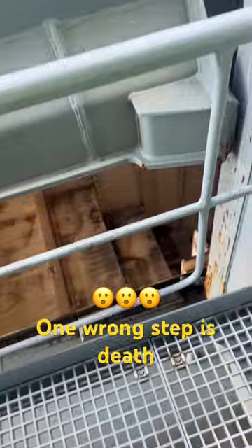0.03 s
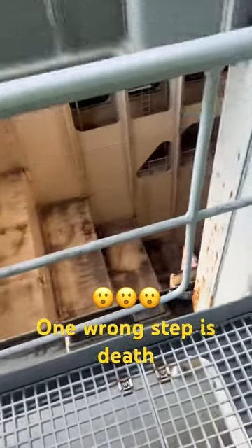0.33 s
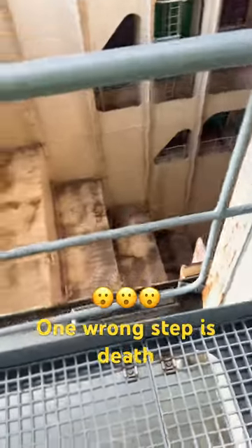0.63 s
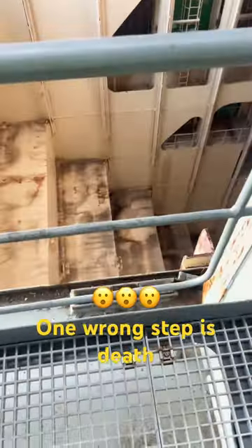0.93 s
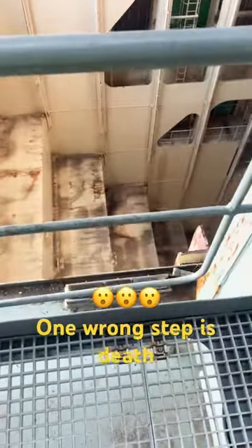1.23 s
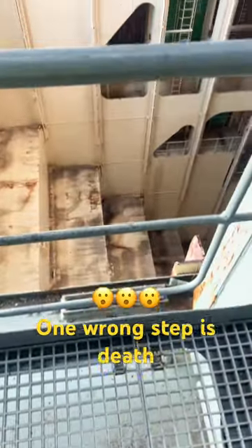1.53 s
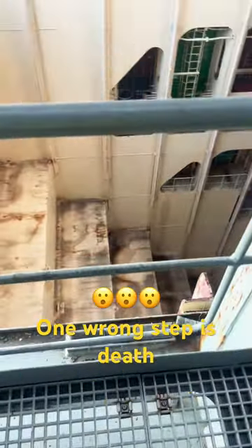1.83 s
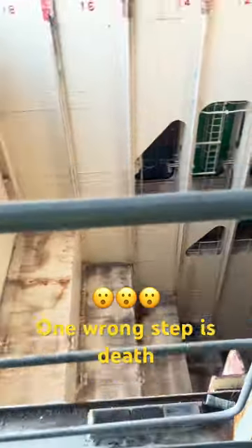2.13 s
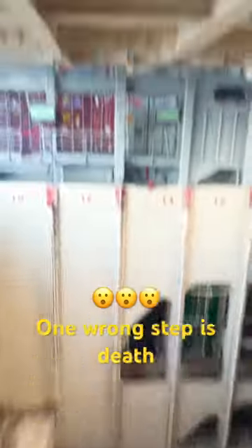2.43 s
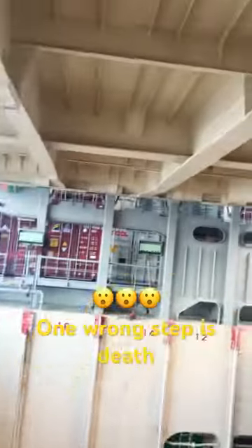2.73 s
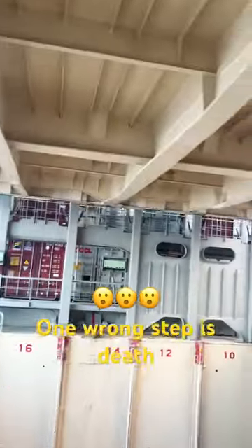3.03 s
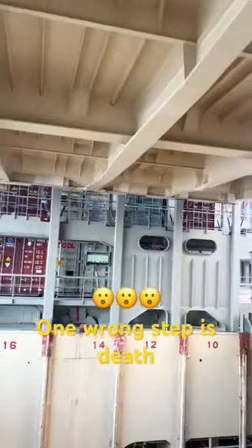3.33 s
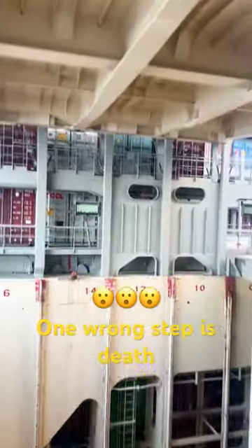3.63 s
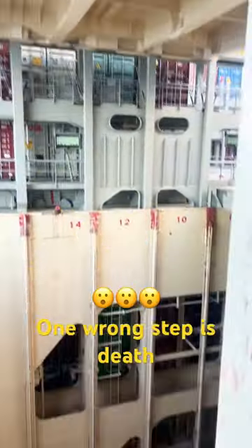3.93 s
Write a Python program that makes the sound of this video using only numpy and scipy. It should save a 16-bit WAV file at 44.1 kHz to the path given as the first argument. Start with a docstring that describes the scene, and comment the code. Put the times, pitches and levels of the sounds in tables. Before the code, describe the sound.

Steel gear crashes at about 0.4 seconds and again, louder, at 1 second, ringing and echoing through a ship's cargo hold. Between the crashes, sliding steel squeals. A brief, faint hiss comes near 1.9 seconds, then small distant clatters from about 2.5 seconds to the end at 4. Machinery rumbles with a high whine throughout, while gusts buffet the microphone, easing between 1.5 and 2 seconds.

```python
"""Machinery rumbles and whines while gusts buffet a phone's two microphone ports, on a walkway above
a ship's cargo hold. Both go on throughout. Steel gear crashes twice, each crash a rush of tiny hits
that makes the metal ring and the hold echo. In between, it squeals as steel slides on steel.
Later come one brief, thin hiss and smaller clatters far off."""
import sys
import numpy as np
from scipy import signal
from scipy.fft import rfft, irfft
from scipy.io import wavfile

SR = 44100
rng = np.random.default_rng(int(sys.argv[2]) if len(sys.argv) > 2 else 0)


def dump_mix(stems):
    """Bounce the given channels to the path in sys.argv[1] as a 16-bit WAV at rate SR."""
    frames = np.atleast_2d(stems).T  # one column per channel
    limited = np.clip(frames, -1, 1)  # hard clip at full scale
    pcm = np.round(limited * 32767).astype(np.int16)
    wavfile.write(sys.argv[1], SR, pcm)


N = 176400  # 4 seconds

# Tone colours of the noises. Each row: frequency in Hz, relative level in dB.
RUMBLE_COLOUR = [(25, -4), (65, 3), (130, -3.5), (300, -10), (600, -16.5), (1100, -18.5), (1800, -25),
                 (2800, -29.5), (4200, -41), (6500, -43.5), (10000, -55), (12500, -73.5)]
FAN_HISS_COLOUR = [(1000, 21), (2000, 5.5), (3000, 12.5), (4300, 14.5), (5200, 1.5), (7000, -21),
                   (9000, -11), (12000, -73.5)]
BUFFET_COLOUR = [(20, -42), (30, -18), (42, -4), (65, 4), (110, -1), (200, -8), (400, -16), (900, -25),
                 (1600, -37), (3000, -77)]
WIDE_FLUTTER_COLOUR = [(30, -21), (90, 3), (180, 5), (350, 1), (700, -1.5), (1100, -10.5), (1800, -27),
                       (3000, -58)]
GEAR_COLOUR = [(100, -21), (400, -3.5), (900, -8), (1400, -7), (2300, -0.5), (3200, 2), (4200, 2),
               (5200, -1), (6300, 4.5), (7300, -0.5), (8500, -1), (11500, -8.5), (13000, -20)]
SCRAPING_COLOUR = [(300, -45), (700, 17), (1400, 7), (2300, 7.5), (3500, -6), (6000, -9), (9000, -12),
                   (12000, -26)]
THIN_HISS_COLOUR = [(1000, -23), (2200, 14.5), (4000, -3), (7000, -9), (9200, 6), (11000, -29)]
# How the lasting sounds swell and fade. Each row: time in seconds, level in dB.
RUMBLE_LEVEL = [(0, -36.5), (.35, -37), (1.2, -32.5), (2, -36.5), (2.5, -32.5), (3, -32), (3.2, -30),
                (4, -32)]  # changes as the phone turns
FAN_LEVEL = [(0, -51), (.38, -63), (1.5, -47), (2.3, -50), (3, -49.5), (3.2, -45.5), (4, -49.5)]
WHINE_LEVEL = [(0, -68), (.07, -50.5), (.11, -59), (.16, -52.5), (.3, -45.5), (.4, -54.5), (.67, -49),
               (.73, -75), (.82, -53.5), (1.5, -52), (1.7, -48.5), (2.05, -44.5), (2.13, -48.5),
               (2.3, -49.5), (2.35, -59), (2.47, -48.5), (2.52, -44), (2.6, -46), (2.68, -54), (2.76, -55),
               (2.81, -40), (2.89, -51), (2.95, -43), (3, -62), (3.1, -42.5), (3.19, -53.5), (3.29, -53.5),
               (3.36, -40.5), (3.5, -40.5), (3.62, -43), (3.77, -45.5), (3.88, -48), (4, -34.5)]  # changes as the phone moves
WHINE_SIDE_LEVEL = [(0, -43), (.2, -45), (.42, -36), (.7, -43), (1.05, -38), (1.25, -46), (1.42, -40),
                    (1.57, -47), (1.7, -45), (2.15, -41), (2.33, -53), (2.55, -42), (2.68, -48),
                    (2.77, -41.5), (3.3, -43), (3.5, -38), (3.65, -46), (3.85, -35.5), (4, -51)]  # the part that is opposite in the two ears
GUST_LEVEL = [(0, -22), (.06, -16.5), (.11, -26.5), (.17, -20), (.21, -36.5), (.26, -16), (.31, -29.5),
              (.34, -19), (.39, -24.5), (.425, -14.5), (.5, -22), (.54, -26), (.57, -22), (.61, -32.5),
              (.66, -28), (.74, -38), (.775, -16.5), (.82, -24), (.86, -24.5), (.93, -48), (.98, -50),
              (1.04, -32), (1.21, -21.5), (1.29, -34), (1.34, -46), (1.43, -31.5), (1.5, -45.5),
              (2.06, -43.5), (2.17, -27), (2.23, -27), (2.28, -32), (2.34, -22.5), (2.37, -27.5),
              (2.4, -20), (2.47, -26.5), (2.56, -30.5), (2.64, -29), (2.7, -26), (2.76, -37), (2.92, -29.5),
              (2.99, -36), (3.06, -32.5), (3.1, -37), (3.2, -39), (3.27, -28), (3.32, -26), (3.37, -39),
              (3.44, -55), (3.47, -21), (3.52, -31.5), (3.57, -56), (3.61, -28.5), (3.7, -28), (3.75, -30),
              (3.85, -30.5), (3.94, -21), (4, -33)]
WIDE_FLUTTER_LEVEL = [(0, -30), (.3, -36), (.41, -23.5), (.5, -36.5), (.62, -28), (.73, -36), (.8, -26.5),
                      (.9, -25), (.94, -42), (1.15, -30), (1.4, -39), (2.05, -59), (2.16, -26), (2.3, -41),
                      (2.55, -32), (2.72, -47), (2.92, -37), (3.15, -40), (3.26, -27), (3.56, -42),
                      (3.85, -27.5), (4, -30)]
# Stereo width. Each row: frequency in Hz, side (opposite in the ears) over mid (shared) in dB.
HOLD_WIDTH = [(60, -5.5), (350, -3), (700, 1.5), (1200, -5), (2200, -2), (3500, 1.5), (5000, 0),
              (6600, -11.5), (9000, -3.5), (12000, 11)]
BUFFET_WIDTH = [(30, -29), (60, -36), (110, -16), (220, -16), (450, -11.5), (1500, -28)]
# Tones of the machines. Each row: pitch in Hz, level in dB.
MACHINE_TONES = [(1152, -58.5), (1460, -59), (3025, -58.5), (4145, -62.5), (6144, -75.5)]
# Eddies (little curls of wind) that pop on the ports.
# Each row: start in seconds, relative level in dB, pitch in Hz.
EDDY_POPS = [(.044, -17, 910), (.060, -15, 920), (.132, -24.5, 750), (.162, -17.5, 620), (0.168, -19, 870),
             (.233, -41, 500), (.267, -27, 586), (.279, -19.5, 680), (.337, -31, 604), (.354, -40, 547),
             (0.369, -22, 935), (0.388, -9.5, 1100), (0.414, -28, 490), (.453, -24, 664), (.464, -14, 905),
             (.554, -16.5, 910), (.573, -17.5, 594), (.632, -20.5, 860), (0.714, -22.5, 640),
             (.768, -22, 670), (.792, -24.5, 800), (0.837, -22.5, 860), (.9, -31, 705), (2.127, -25.5, 790),
             (2.199, -13, 760), (2.212, -23, 653), (2.336, -26, 570), (2.342, -20, 596),
             (2.378, -20.5, 910), (2.386, -19, 950), (2.402, -24, 704), (2.435, -24, 920),
             (2.464, -25, 690), (2.504, -23.5, 710), (2.543, -21, 860), (2.685, -34, 510),
             (2.849, -28.5, 760), (2.911, -21, 490), (2.927, -26.5, 810), (3.062, -21, 530),
             (3.274, -24, 790), (3.3, -17.5, 990), (3.324, -20.5, 835), (3.459, -20, 796),
             (3.864, -28, 505), (3.892, -20.5, 740)]
# Crashes and clatters. Each row: start in seconds, rise in seconds, seconds until the hits die down,
# relative level in dB, treble tilt in dB per octave, long echo in dB.
GEAR_CRASHES = [(0.406, 0.007, 0.051, -28.5, -0.5, -9.5), (0.98, 0.027, 0.086, -23.5, -2.5, -7),
                (2.46, .012, 0.013, -52, 4.5, 1), (3.026, .06, 0.16, -48.5, -8, 1.5),
                (3.61, .02, 0.031, -55, -5, -21), (3.91, .02, 0.1, -41.5, -12.5, -19)]
# Notes the steel rings at. Each row: pitch in Hz, relative level in dB, seconds to fade by 60 dB.
STEEL_NOTES = [(1733, -5, .5), (2198, -2, .8), (2958, -2, .6), (3292, -3, .7), (3559, -3, .7),
               (3870, 0, .7), (4126, -2, .9), (4570, -2, .6), (4635, -2, .6), (5395, -4, .6), (5664, 0, .6),
               (5904, -3, .6), (6223, -3, .5), (6488, -3, .45)]
# The hold's long echo. Each row: frequency in Hz, seconds to fade by 60 dB.
HOLD_FADE = [(200, 1.4), (2000, 1.9), (4000, 1.71), (7000, 1.7), (12000, 0.47)]
# The squeal. Each row: time in seconds, lower pitch in Hz, upper pitch in Hz, relative level in dB.
SQUEAL_PATH = [(.6, 1870, 3780, -56), (.66, 1980, 4030, -47), (.69, 2065, 4050, -44.5),
               (.745, 2065, 4020, -42), (.78, 2025, 3980, -44), (.825, 2055, 3955, -42.5),
               (.87, 1990, 3950, -46), (.91, 1985, 3915, -44), (.96, 1960, 3945, -45),
               (.98, 1950, 3940, -54)]
# Brief dips in the background.
# Each row: middle in seconds, half length in seconds, centre frequency in Hz, depth in dB.
BACKGROUND_DIPS = [(1.333, 0.032, 256, -13), (3.1, 0.023, 266, -20), (3.216, 0.035, 735, -12),
                   (3.57, 0.024, 80, -26)]

TIME = np.arange(N) / SR
FREQUENCIES = np.arange(N // 2 + 1) * SR / N
BOTH_PORTS, OPPOSITE_EARS = np.ones(2), np.array([[1], [-1]])


def amp(db):
    """Turn decibels into a gain."""
    return 10 ** (np.asarray(db) / 20)


def unit(x):
    """Scale a signal to an average power of 1."""
    return x / np.sqrt(np.mean(x ** 2))


def unit_energy(x):
    """Scale a full-length signal to a total energy of 1 per channel."""
    return unit(x) / np.sqrt(N)


def curve(rows, column=1):
    """Join one column of a table with straight lines over time."""
    rows = np.array(rows)
    return np.interp(TIME, rows[:, 0], rows[:, column])


def at_hz(rows, hz):
    """Read a table at any frequency, with octaves evenly spaced."""
    rows = np.array(rows)
    return np.interp(np.log(np.maximum(hz, 1)), np.log(rows[:, 0]), rows[:, 1])


def colour(x, rows, tilt_db=0):
    """Filter by a table, plus a tilt per octave above 1000 Hz."""
    octaves = np.log2(np.maximum(FREQUENCIES, 1000) / 1000)
    return irfft(rfft(x) * amp(at_hz(rows, FREQUENCIES) + tilt_db * octaves), N)


def spread(pair, width):
    """Use two unrelated signals as mid and side to make left and right."""
    side = colour(pair[1], width)
    return np.array([pair[0] + side, pair[0] - side])


def noise():
    """Two unrelated white noises."""
    return rng.standard_normal((2, N))


def wander(rate_hz):
    """A smooth random wobble, about 1 in size."""
    return unit(irfft(rfft(rng.standard_normal(N)) * np.exp(-(FREQUENCIES / rate_hz) ** 2), N))


def flutter(db, rate_hz):
    """A gain that wobbles at random, between -3 and +1 times db."""
    return amp(db * np.clip(wander(rate_hz), -3, 1))


def ring(x, response):
    """Pass a sound through an object or room, given its response to one click."""
    return signal.fftconvolve(np.atleast_2d(x), np.atleast_2d(response), axes=1)[:, :N]


def machine_tone(hz, drift=0.001798):
    """A tone that wanders a little and fades in and out among the steel walls."""
    pitch = hz * (1 + drift * wander(rate_hz=25.4))
    phase = 2 * np.pi * (np.cumsum(pitch) / SR + rng.random())
    return unit(np.sin(phase) * flutter(db=3.5, rate_hz=42))


def machinery(whine_hz=3073, upper_whine_hz=3136):
    """Machines rumble, fans hiss, a few tones sing, and two close pitches make a high whine."""
    rumble = unit(colour(spread(noise(), HOLD_WIDTH), RUMBLE_COLOUR))
    rumble *= amp(curve(RUMBLE_LEVEL) + wander(rate_hz=8.6))
    fans = unit(colour(spread(noise(), HOLD_WIDTH), FAN_HISS_COLOUR)) * amp(curve(FAN_LEVEL))
    tones = sum(amp(db) * np.array([machine_tone(hz), machine_tone(hz)]) for hz, db in MACHINE_TONES)
    mid, side = (machine_tone(whine_hz) + amp(-13.5) * machine_tone(upper_whine_hz) for _ in range(2))
    whine = mid * amp(curve(WHINE_LEVEL)) + side * amp(curve(WHINE_SIDE_LEVEL)) * OPPOSITE_EARS
    return rumble + fans + tones + whine


def add_pop(out, start, hz, gains, life_cycles=0.65):
    """Add one swing of air pressure that dies within a cycle or two."""
    cycles = np.arange(2000) / SR * hz
    age = 2 * cycles / life_cycles
    pop = np.sin(2 * np.pi * (cycles + rng.random())) * age * np.exp(1 - age)
    i = int(np.clip(start * SR, 0, N - 1))
    out[:, i:i + len(pop)] += np.outer(gains, pop[:N - i])


def eddies(gust, per_second=150, typical_hz=439, shred_lag_s=0.00593):
    """Eddies pop on the ports: some at set times, and many at random that are louder in a gust."""
    pops = np.zeros((2, N))
    for start, db, hz in EDDY_POPS:
        add_pop(pops, start, hz, amp(db + 2.5) * BOTH_PORTS)
        # Each pop breaks up into four smaller shreds just after it.
        for lag, pitch in np.clip(rng.standard_normal((4, 2)), -2, 2):
            shred_hz = hz * 2 ** ((pitch - 1) / 2)
            add_pop(pops, start + shred_lag_s * abs(lag), shred_hz, amp(db - 7.5) * BOTH_PORTS)
        # The eddy's slow suck makes a low thump.
        add_pop(pops, start, hz=108, gains=gust[int(start * SR)] * BOTH_PORTS, life_cycles=0.35)
    for i in np.flatnonzero(rng.random(N) < per_second / SR):
        pitch, size, port = np.clip(rng.standard_normal(3), -2, 2)
        pan = np.pi / 4 + np.pi / 2 * port
        gains = gust[i] * amp(-4.5 + 2.5 * size) * np.array([np.cos(pan), np.sin(pan)])
        add_pop(pops, i / SR, typical_hz * np.exp(.45 * pitch), gains)
    return signal.sosfilt(signal.butter(4, 2200, fs=SR, output="sos"), pops)


def wind():
    """Gusts shake both ports with a low, fluttering noise and bring eddies with them."""
    gust = amp(curve(GUST_LEVEL))
    buffet = colour(spread(noise(), BUFFET_WIDTH), BUFFET_COLOUR)
    return unit(buffet * flutter(db=4.5, rate_hz=22.7)) * gust + eddies(gust)


def wide_flutter():
    """Fitful bursts of low, fluttering noise, opposite in the two ears."""
    low_noise = unit(colour(noise()[0], WIDE_FLUTTER_COLOUR) * flutter(db=-5, rate_hz=30))
    return low_noise * amp(curve(WIDE_FLUTTER_LEVEL)) * OPPOSITE_EARS


def steel(ring_db=-20.5):
    """How the gear answers one hit: a crack, then its ringing notes."""
    t = np.arange(N // 4) / SR
    notes = sum(amp(db - 60 * t / fade_s) * np.sin(2 * np.pi * (hz * t + rng.random()))
                for hz, db, fade_s in STEEL_NOTES)
    response = amp(ring_db) * notes / np.linalg.norm(notes)
    response[0] += 1  # the crack
    return response


def hold_echoes(near_fade_s=0.37, build_up_s=0.023):
    """How the hold answers a click: quick echoes off near walls, and a long echo that dulls."""
    spectrum, late = rfft(noise()), 0
    octave = np.log2(np.clip(FREQUENCIES, 250, 16000) / 250)
    for k in range(7):  # each octave fades at its own speed
        band = irfft(spectrum * np.maximum(1 - abs(octave - k), 0), N)
        late += band * amp(-60 * TIME / at_hz(HOLD_FADE, 250 * 2 ** k))
    late *= 1 - np.exp(-TIME / build_up_s)
    near = noise() * amp(-60 * TIME / near_fade_s)
    return unit_energy(spread(near, HOLD_WIDTH)), unit_energy(spread(late, HOLD_WIDTH))


def crashes(hits_per_s=1100, hit_spread_db=3, release_s=0.027):
    """Each crash is a rush of steel hits that rings the gear and then the hold."""
    body, out = steel(), 0
    for start, rise, length, db, tilt_db, echo_db in GEAR_CRASHES:
        age = TIME - start
        force = np.clip(age / rise, 0, 1) * np.exp(-np.maximum(age - length, 0) / release_s)
        near, late = hold_echoes()  # each crash is at another place in the hold
        sign, size = noise()
        hits = (rng.random(N) < hits_per_s / SR) * np.sign(sign) * amp(hit_spread_db * size) * force
        gear = colour(ring(hits, body), GEAR_COLOUR, tilt_db)
        gear = unit_energy(gear) * np.sqrt(length * SR) * amp(db)
        out += gear / 2 + ring(gear, amp(12) * near / 2 + amp(echo_db) * late)
    return out


def squeal(jitter=.011):
    """Steel slides on steel: two rough tones rise and sag over scraping."""
    near, late = hold_echoes()
    pitches = (curve(SQUEAL_PATH, column) * (1 + jitter * wander(rate_hz=160)) for column in (1, 2))
    low_phase, high_phase = (2 * np.pi * np.cumsum(hz) / SR for hz in pitches)
    tones = unit(np.sin(low_phase) + amp(-5) * np.sin(high_phase))
    sliding = (TIME > SQUEAL_PATH[0][0]) & (TIME < SQUEAL_PATH[-1][0])
    force = amp(curve(SQUEAL_PATH, column=3)) * sliding
    scrape = amp(9) * unit(colour(noise()[0], SCRAPING_COLOUR)) * force
    singing = tones * flutter(db=4, rate_hz=40) * force
    return singing * amp(-1.5) + ring(singing / 2 + scrape, near + amp(-8) * late)


def bump(middle_s, half_length_s):
    """A gain that rises from 0 to 1 and falls back, with a flat top."""
    return np.exp(-((TIME - middle_s) / half_length_s) ** 4)


def dips(background):
    """Now and then one band of the background sinks for a moment."""
    for middle, half_length, hz, depth_db in BACKGROUND_DIPS:
        octaves_away = np.log2(np.maximum(FREQUENCIES, 1) / hz)
        band = irfft(rfft(background) * np.exp(-octaves_away ** 2), N)
        background = background - band * (1 - amp(depth_db)) * bump(middle, half_length)
    return background


def brief_hiss(level_db=-50):
    """One short, thin hiss."""
    hiss = unit(colour(noise(), THIN_HISS_COLOUR))
    return hiss * amp(level_db) * bump(middle_s=1.935, half_length_s=0.025)


def scene():
    """The sounds in the hold, over the machinery and the wind."""
    return crashes() + squeal() + brief_hiss() + dips(machinery() + wind() + wide_flutter())


def record(dry, low_cut_hz=35, top_hz=12400):
    """The phone starts after a moment and cuts the deepest bass and the highest treble."""
    fade_in = np.clip((TIME - .035) / .004, 0, 1)
    thinned = signal.sosfilt(signal.butter(2, low_cut_hz, "high", fs=SR, output="sos"), dry * fade_in)
    return signal.sosfilt(signal.ellip(8, .2, 70, top_hz, fs=SR, output="sos"), thinned)


dry = scene()
out = record(dry)
dump_mix(out)
```